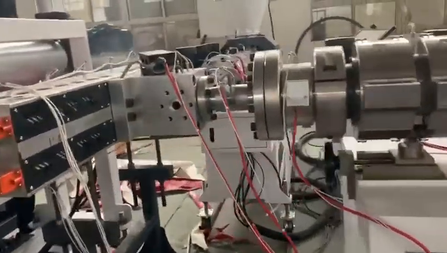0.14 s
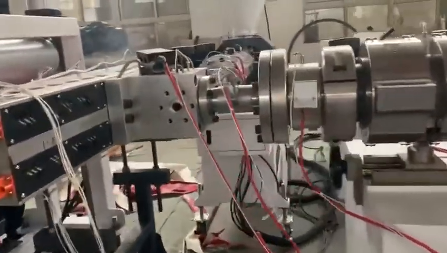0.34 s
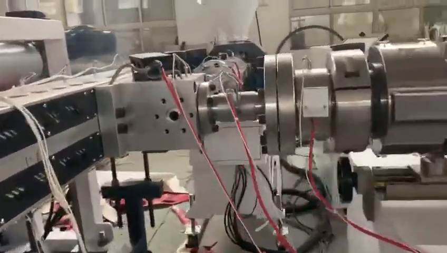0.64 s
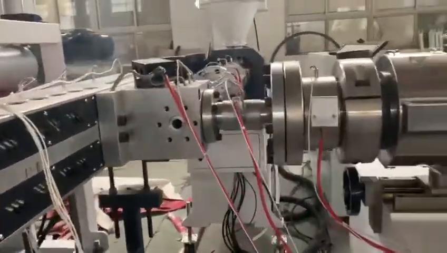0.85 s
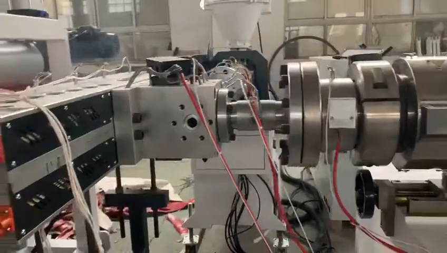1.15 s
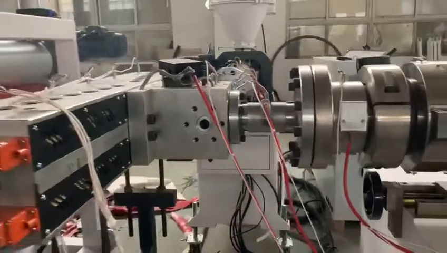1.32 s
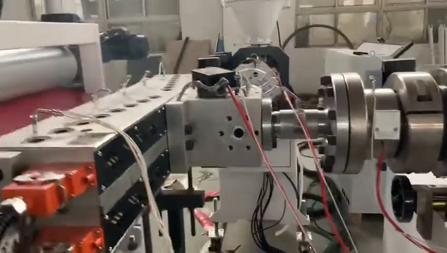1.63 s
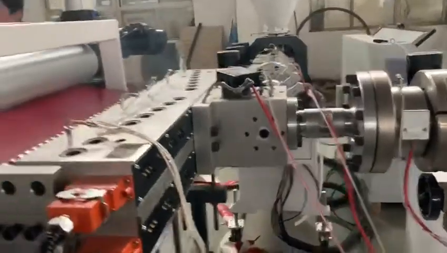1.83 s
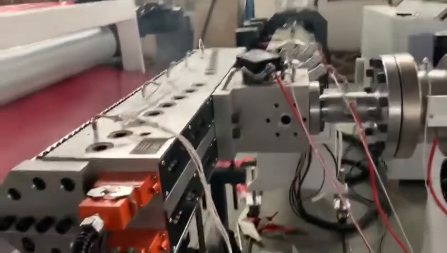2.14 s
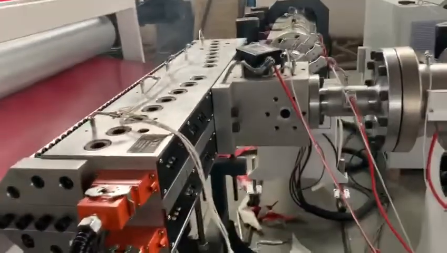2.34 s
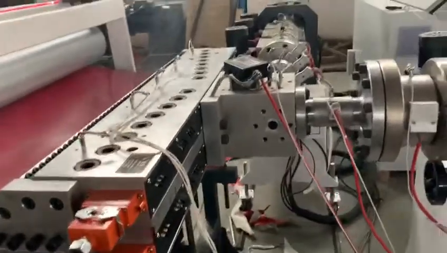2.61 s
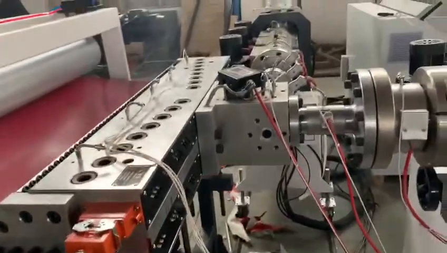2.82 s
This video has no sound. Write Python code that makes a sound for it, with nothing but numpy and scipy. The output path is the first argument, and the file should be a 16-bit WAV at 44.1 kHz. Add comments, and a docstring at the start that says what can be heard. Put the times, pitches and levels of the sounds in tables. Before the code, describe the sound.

Plastic extrusion machinery runs throughout in a reverberant factory hall: dense roar, wavering low motor hum and a piercing gear whine around 2.5 kHz that beats rapidly. Cooling air rushes and whistles, dipping near 0.9 s, with bright close hiss. Low rumble thins after 1.4 s as the handheld microphone moves. Small metal ticks fall between 0.4 and 1.65 s, sharpest at 1.53; a dull knock comes at 2.55.

```python
"""Extrusion line, factory hall

A hand-held two-port microphone drifts along the die: hall roar, a thinning rumble and cooling air are shaped noise.
Motor orders hum as wavering sine lines; a gear mesh whines as a comb of shaft sidebands that beats.
Air hisses close by, reaching the right port first; a band of the cooling air whistles as sliding resonant noise.
Single pitches swell briefly; small metal ticks, one with a short 3.9 kHz ring, clinks and one dull knock
ring as decaying modes."""
import sys
import numpy as np
from scipy import signal
from scipy.io import wavfile
from scipy.ndimage import uniform_filter1d

SR = 44100
rng = np.random.default_rng(int(sys.argv[2]) if len(sys.argv) > 2 else 0)


def to_linear_factor(level_db):
    """Convert decibel levels (scalar or array-like) to linear amplitude factors."""
    exponent = np.asarray(level_db, float) / 20
    return 10 ** exponent


def dump(signal):
    """Clip the signal to [-1, 1] and save it as 16-bit WAV at the path in sys.argv[1]."""
    limited = np.clip(np.atleast_2d(signal).T, -1, 1)
    pcm = np.round(limited * 32767).astype(np.int16)
    wavfile.write(sys.argv[1], SR, pcm)


N = 130977  # samples

# Spectrum tables give the level before their level course and flicker are added.
# Hall roar of all machines. Each row: frequency in Hz, level in dB per Hz.
ROAR_SPECTRUM = [(20, -84), (30, -70), (60, -75), (100, -67), (160, -59), (220, -51), (300, -55),
                 (420, -55.5), (600, -60), (1000, -62.5), (1500, -67.5), (2100, -64.5), (2500, -64.5),
                 (2800, -60), (3200, -70), (4000, -72), (7000, -75.5), (8500, -110)]
# How alike the roar is at the two ports. Each row: frequency in Hz, likeness from 0 to 1.
ROAR_LIKENESS = [(30, 0.96), (200, 0.78), (400, 0.57), (550, 0.35), (1500, 0.54), (2200, 0.15),
                 (5000, 0.081)]
# Course of the roar. Each row: time in seconds, level change in dB.
ROAR_COURSE = [(0, 6), (.07, 3), (.13, -2), (.5, 0.5), (1, -1.5), (1.5, -1.5), (2, 0), (2.499, -1.5),
               (2.97, -1)]
# Low rumble of a drive that the microphone leaves behind. Each row: frequency in Hz, level in dB per Hz.
RUMBLE_SPECTRUM = [(35, -90), (50, -61.5), (90, -57), (130, -61.5), (170, -95.5)]
# Course of the rumble, thinning along the walk. Each row: time in seconds, level change in dB.
RUMBLE_COURSE = [(0, 12), (.12, 3.5), (.3, 1.5), (.6, -0.5), (1, 0), (1.4, -1.5), (1.8, -5.5), (2.97, -8)]
# Rushing cooling air with duct resonances. Each row: frequency in Hz, level in dB per Hz.
RUSH_SPECTRUM = [(2800, -98), (3500, -72), (4100, -74), (4600, -67), (5300, -80.5), (6200, -77),
                 (6700, -69), (7200, -75), (7900, -106)]
# Course of the cooling air. Each row: time in seconds, level change in dB.
RUSH_COURSE = [(0, 0), (.15, 2), (.5, 4), (.75, 1), (.9, -15), (1.15, -7), (1.35, 2.5), (1.8, 2.5),
               (2.2, 2), (2.6, 2.5), (2.97, 0)]
# Compressed-air hiss from one close spot. Each row: frequency in Hz, level in dB per Hz.
HISS_SPECTRUM = [(5000, -90), (6500, -80.5), (7600, -74), (8700, -71.5), (10000, -72), (12500, -75.5),
                 (14000, -71), (15400, -71)]
# Course of the hiss. Each row: time in seconds, level change in dB.
HISS_COURSE = [(0, 6), (.1, -1), (.45, 1), (.9, -2), (1.5, -0.5), (2.2, -1), (2.97, -1)]
# Pump motor orders. Each row: multiple of shaft speed, level in dB rms before the walk, left over right in dB.
MOTOR_ORDERS = [(3, -54, -11), (4, -38, 0), (5, -40.5, -6), (6, -45.5, 7), (7, -52, -4), (8, -39, 3.5),
                (9, -58, 0)]
# Hum along the walk. Each row: time in seconds, level change in dB, tilt in dB per order above the fourth.
MOTOR_WALK = [(0, 5.5, -2.5), (.3, -0.5, -2.5), (.55, 3.5, -1.5), (.7, 0.5, -0.4), (1.1, -0.5, 0),
              (1.5, 1, 1), (1.9, -1.5, 0.97), (2.3, 0.5, 0.66), (2.6, -2, .5), (2.97, 2.5, -1.2)]
# Lone tones of other drives. Each row: frequency in Hz, level in dB rms, left over right in dB.
LONE_TONES = [(759, -49, -1), (1007, -53, 0)]
# A fan's blade tone along the walk. Each row: time in seconds, level in dB rms.
BLADE_COURSE = [(0, -47), (.4, -41), (.6, -38), (.7, -46.5), (1.3, -46), (1.6, -42), (2.6, -40),
                (2.97, -47)]
# Deep throb through the floor. Each row: time in seconds, level in dB rms.
THROB_COURSE = [(0, -56), (.5, -51), (1, -49), (1.3, -42.5), (1.9, -44), (2.2, -43), (2.45, -56),
                (2.7, -46), (2.97, -43)]
# Gear whine lines, six shaft steps under the mesh to four over. Each entry: level in dB rms before the walk.
SIDEBAND_LEVELS = [-52, -49, -52, -42, -48, -39, -38, -44, -41, -53, -52]
# Whine as the microphone moves through the standing field.
# Each row: time in seconds, level change in dB, favoured pitch in Hz, second favoured pitch in Hz.
WHINE_WALK = [(0, 0, 2478, 2572), (.25, -4, 2473, 2572), (.42, 3, 2521, 2621), (.55, 0, 2515, 2560),
              (.7, -1, 2512, 2572), (.85, 1, 2500, 2600), (1.02, .5, 2505, 2621), (1.14, 0, 2512, 2375),
              (1.3, 1, 2487, 2390), (1.47, 1, 2485, 2560), (1.6, -4.5, 2500, 2572), (1.75, -3, 2540, 2572),
              (1.88, -1, 2550, 2385), (2.1, -2, 2621, 2375), (2.25, -3, 2465, 2375), (2.5, 1, 2462, 2400),
              (2.68, 1, 2480, 2605), (2.85, 1, 2484, 2600), (2.97, -2, 2490, 2572)]
# Crispness of the whine's beat, smeared by reflections.
# Each row: time in seconds, smear in radians per squared step from the mesh, right port's lead in radians.
BEAT_SMEAR = [(0, 1.3, 1.9), (.3, 1.3, 1.6), (.45, 1, 1.2), (.62, .7, 1.7), (.8, .4, .9), (1.15, .8, 1),
              (1.3, .4, 1.3), (1.5, 1, 2.1), (1.75, 1.4, 1.3), (2.2, 1.2, 1.1), (2.5, 1, 1.7),
              (2.68, .1, 1.5), (2.97, 0, 1.3)]
# Whistling band of the cooling air. Each row: time in seconds, level in dB rms, centre in Hz.
WHISTLE_COURSE = [(0, -45, 4270), (.3, -51, 4300), (.55, -43, 4200), (.75, -39.5, 4286), (1, -56, 4495),
                  (1.4, -45, 4600), (2, -43, 4770), (2.5, -39.5, 4460), (2.97, -48, 4530)]
# Metal ticks. Each row: start in seconds, level in dB, dullness in dB per octave under 9 kHz.
TICK_BLOWS = [(.3845, -23, -4), (1.0034, -27, 2), (1.3608, -20, -4), (1.5314, -9.5, 0), (1.6447, -20, 4)]
# Modes of a tick. Each row: frequency in Hz, level in dB, time to fall by 60 dB in seconds.
TICK_RING = [(7000, -10, .025), (9060, 0, .028), (10940, -11, .04), (11370, -13, .045), (13400, -9, .018)]
# Brief tones: swells of single pitches, and the short 3.9 kHz ring of the tick at one second.
# Each row: start in seconds, length in seconds, pitch in Hz, level in dB rms at the height of the tone.
SHORT_TONES = [(.4, .3, 4200, -36.5), (0.594, .22, 986, -37.5), (0.998, 0.023, 3900, -36),
               (0.544, .16, 2740, -37.5), (1.86, 0.24, 2750, -36), (2.265, 0.23, 918, -37),
               (2.4, 0.47, 431, -38)]
# Lower clinks close to the right port. Each row: start in seconds, level in dB at the right port.
CLINK_BLOWS = [(1.3626, -19), (1.5326, -23)]
# Modes of a clink. Each row: frequency in Hz, level in dB, time to fall by 60 dB in seconds.
CLINK_RING = [(5200, 0, .04), (5420, -3, .04)]
# Modes of the knock. Each row: frequency in Hz, level in dB, time to fall by 60 dB in seconds.
KNOCK_RING = [(1276, 0, 0.072), (1680, -5, .4), (1790, -5, .6)]

PORT_LAG_S = .000207  # the left port hears later


def evened(x):
    """Scales to unit power."""
    return x / np.sqrt(np.mean(x ** 2) + 1e-20)


def read(points, at, log=False):
    """Joins table points by straight lines, on a log axis if asked."""
    x, value = np.transpose(points)
    if log:
        return np.interp(np.log(at + 1), np.log(x + 1), value)
    return np.interp(at, x, value)


def column(table, index):
    """One column of a time table, per sample."""
    return np.interp(np.arange(N) / SR, *np.transpose(table)[[0, index]])


def wander(top_hz, count):
    """Slow curves of about unit spread: sixteen sines each, up to top_hz, with random phases."""
    t = np.arange(0, N + 256, 128) / SR
    hz = np.geomspace(.2, top_hz, 16)
    cycles = hz[:, None] * t + rng.random((count, 16, 1))
    coarse = np.sin(2 * np.pi * cycles).sum(1) / np.sqrt(8)
    return np.array([np.interp(np.arange(N) / SR, t, row) for row in coarse])


def port_turn(hz, in_step_hz):
    """Phase by which the right port leads; it lingers near in step and near opposed."""
    turn = 2 * np.pi * PORT_LAG_S * (hz - in_step_hz)
    return turn - .4 * np.sin(2 * turn)


def noise(spectrum, course, likeness, in_step_hz, patchy_db, flicker_db, speckle_db, size=1024):
    """Random short-time spectra with drifting patches, fine speckle and a flicker shared over wide bands."""
    hop = size // 4
    frames, hz = N // hop + 5, np.fft.rfftfreq(size, 1 / SR)

    def grain(bins, steps):
        field = rng.standard_normal((len(hz), frames))
        return evened(uniform_filter1d(uniform_filter1d(field, bins, axis=0), steps, axis=1))

    a, b, c, d = rng.standard_normal((4, len(hz), frames))
    same = np.clip(likeness(hz), 0, 1)[:, None]
    left, apart = a + 1j * b, c + 1j * d
    lead = np.exp(1j * port_turn(hz, in_step_hz))[:, None]
    right = same * left * lead + np.sqrt(1 - same ** 2) * apart
    db = read(spectrum, hz, True)[:, None] + read(course, np.arange(frames) * hop / SR)
    db = db + patchy_db * grain(12, 20) + flicker_db * grain(120, 4) + speckle_db * grain(2, 10)
    z = np.array([left, right]) * to_linear_factor(db) * np.sqrt(SR / size)
    return signal.istft(z, nperseg=size, noverlap=size - hop)[1][:, :N]


def tone(hz, db, pan_db, waver_db, drift, lead, pace_hz, start=None, spread=.6):
    """One line whose level and phase waver, partly apart at the two ports, as the microphone moves in the hall."""
    both, left, right, sway, apart = wander(pace_hz, count=5)
    if start is None:
        start = 2 * np.pi * rng.random()
    phase = 2 * np.pi * hz * np.arange(N) / SR + start + drift * sway
    spread = min(hz / 2000, spread)  # low tones stay alike at both ports
    waver = waver_db * (both + 2 * spread * np.array([left, right]))
    level = to_linear_factor(db + waver + np.c_[[pan_db / 2, -pan_db / 2]])
    return np.sqrt(2) * level * np.cos([phase, phase + lead + spread * apart])


def hall_roar():
    """All machines blended by the hall: noise more alike at the two ports in the bass."""
    return noise(ROAR_SPECTRUM, ROAR_COURSE, lambda hz: read(ROAR_LIKENESS, hz, True), 0, 1.0, .4, 2.0, size=2048)


def rumble():
    """A drive left behind: low noise, nearly the same at both ports."""
    return noise(RUMBLE_SPECTRUM, RUMBLE_COURSE, lambda hz: .95 + 0 * hz, 0, 1.0, .43, .97, size=2048)


def cooling_air():
    """Turbulent air coloured by duct resonances: noise nearly separate at each port."""
    return noise(RUSH_SPECTRUM, RUSH_COURSE, lambda hz: .15 + 0 * hz, 11000, 1.5, 1.5, 3.8)


def air_hiss():
    """A leak at one close spot: bright noise much alike at both ports, led by the right, in step at 11 kHz."""
    return noise(HISS_SPECTRUM, HISS_COURSE, lambda hz: .89 + 0 * hz, 11000, .64, .25, 4.6)


def motors():
    """Shaft orders of the pump motor, lone tones of other drives, a fan blade and a deep throb through the floor."""
    shaft_hz, blade_hz, throb_hz = 48.5, 1059.5, 37.7
    walk_db, tilt_db = column(MOTOR_WALK, index=1), column(MOTOR_WALK, index=2)
    out = np.zeros((2, N))
    for order, db, pan_db in MOTOR_ORDERS:
        hz = order * shaft_hz
        out += tone(hz, db + walk_db + tilt_db * (order - 4), pan_db, 1.4, .6, port_turn(hz, 0), 6)
    for hz, db, pan_db in LONE_TONES:
        out += tone(hz, db, pan_db, 1.5, .5, port_turn(hz, 0), 8)
    out += tone(blade_hz, column(BLADE_COURSE, index=1), -2, .8, .4, port_turn(blade_hz, 0), 6)
    return out + tone(throb_hz, column(THROB_COURSE, index=1), 0, 1.2, .5, 0, 11)


def gears():
    """Tooth mesh with shaft sidebands that beat once per turn; lines near the two favoured pitches stand out."""
    mesh_hz, shaft_hz, beat_s = 2523, 49.2, 2.85  # beat_s: moment of one of the beats
    favour_db, favour_width_hz = 10, 60
    walk_db = column(WHINE_WALK, index=1)
    favoured_hz = np.array([column(WHINE_WALK, index=2), column(WHINE_WALK, index=3)])
    smear, lead = column(BEAT_SMEAR, index=1), column(BEAT_SMEAR, index=2)
    out = np.zeros((2, N))
    for step, line_db in enumerate(SIDEBAND_LEVELS, start=-6):
        hz = mesh_hz + step * shaft_hz
        nearness = np.exp(-((hz - favoured_hz) / favour_width_hz) ** 2).max(axis=0)
        lift_db = favour_db * (nearness - .5)
        # lines line up at the beat, apart from the smear
        start = smear * step ** 2 - 2 * np.pi * hz * beat_s
        out += tone(hz, line_db + walk_db + lift_db, 0, .6, .25, lead, 3, start, spread=.3)
    return out


def whistle():
    """Noise in a sliding two-stage resonance, separate at each port."""
    width_hz = 380  # of each stage
    turn = np.exp(2j * np.pi * np.cumsum(column(WHISTLE_COURSE, index=2)) / SR)
    r = np.exp(-np.pi * width_hz / SR)
    hiss = rng.standard_normal((2, N)) + 1j * rng.standard_normal((2, N))
    slow = signal.lfilter([1], np.convolve([1, -r], [1, -r]), hiss)
    return to_linear_factor(column(WHISTLE_COURSE, index=1)) * evened((slow * turn).real)


def ring(s, level_db, modes, dull_db, in_step_hz):
    """A blow rings a set of decaying modes; the right port leads in phase by port_turn."""
    out, t = np.zeros((2, N)), np.arange(SR // 3) / SR
    for hz, db, t60 in modes:
        fall_db = -60 * t / t60
        tilt_db = dull_db * np.log2(9000 / hz)
        size = to_linear_factor(level_db + db + fall_db + tilt_db) * np.minimum(t / .0004, 1)  # 0.4 ms rise
        phase = 2 * np.pi * (hz * t + rng.random())
        place = out[:, round(s * SR):][:, :len(t)]
        place += size * np.sin(phase + np.c_[[0, port_turn(hz, in_step_hz)]])
    return out


def ticks():
    """Small metal blows ringing high modes, in step at both ports at 10.5 kHz."""
    return sum(ring(s, db, TICK_RING, dull, 10500) for s, db, dull in TICK_BLOWS)


def cracks():
    """The bright snap that starts each tick: differenced noise dying fast, later at the left port."""
    offset_db, decay_s = -12, .0012  # offset from the tick's level, before differencing
    out, t = np.zeros((2, N)), np.arange(400) / SR
    for s, db, dull in TICK_BLOWS:
        snap = np.diff(rng.standard_normal(401)) * np.exp(-t / decay_s) * to_linear_factor(db + offset_db)
        out[1, round(s * SR):][:400] += snap
        out[0, round((s + PORT_LAG_S) * SR):][:400] += snap
    return out


def brief_tones():
    """Swells of single pitches and a tick's short ring, the right port a quarter cycle ahead on average."""
    out, t = np.zeros((2, N)), np.arange(N) / SR
    for s, length, hz, db in SHORT_TONES:
        arch = np.sin(np.pi * np.clip((t - s) / length, 0, 1)) ** .5
        out += tone(hz, db, 0, .43, .39, np.pi / 2, 7.07) * arch
    return out


def clinks():
    """Lower metal blows close to the right port, 13 dB weaker at the left."""
    return to_linear_factor([[-13], [0]]) * sum(ring(s, db, CLINK_RING, 0, 0) for s, db in CLINK_BLOWS)


def knock():
    """One dull blow ringing a few middle modes."""
    return ring(2.547, -24.5, KNOCK_RING, 0, 0)


def scene():
    """All machines, air and small blows at the two ports."""
    air = hall_roar() + rumble() + cooling_air() + air_hiss()
    steady = motors() + gears() + whistle()
    brief = ticks() + cracks() + brief_tones() + clinks() + knock()
    return air + steady + brief


def low_pass(x):
    """Removes everything above the highest recorded frequency."""
    return signal.sosfilt(signal.butter(12, 17010, fs=SR, output="sos"), x)


def record(dry):
    """Microphone band limits: a low cut at 35 Hz and a steep treble edge at 15.7 kHz."""
    low_cut = signal.butter(4, 35, "high", fs=SR, output="sos")
    treble_edge = signal.firwin(511, 15700, window=("kaiser", 9), fs=SR)
    band = signal.oaconvolve(signal.sosfilt(low_cut, dry), treble_edge[None], "same")
    return low_pass(band)


dry = scene()
out = record(dry)
dump(out)
```